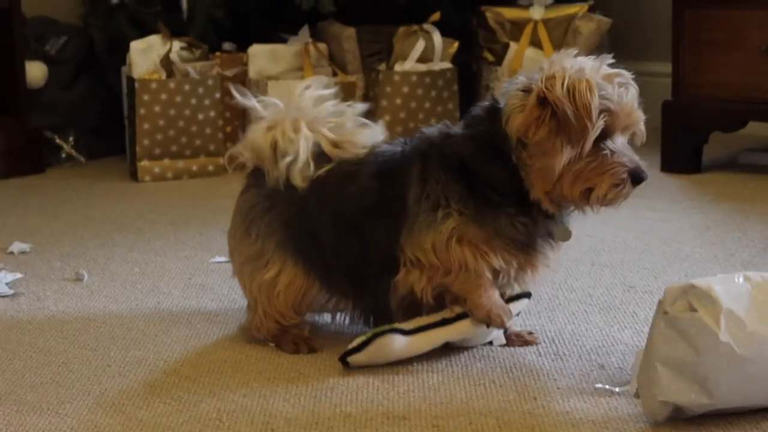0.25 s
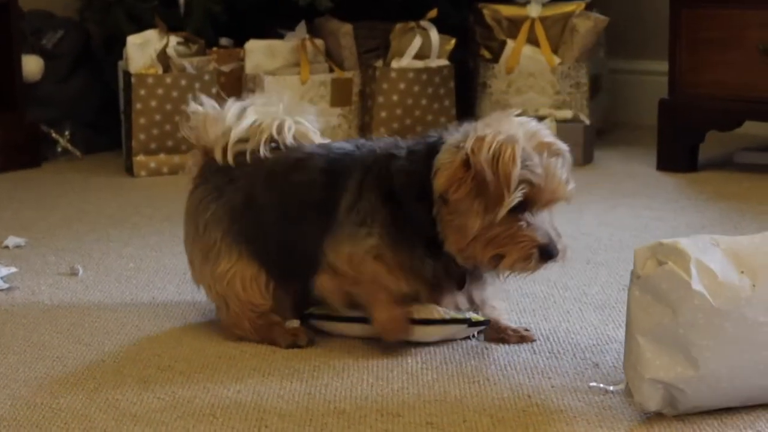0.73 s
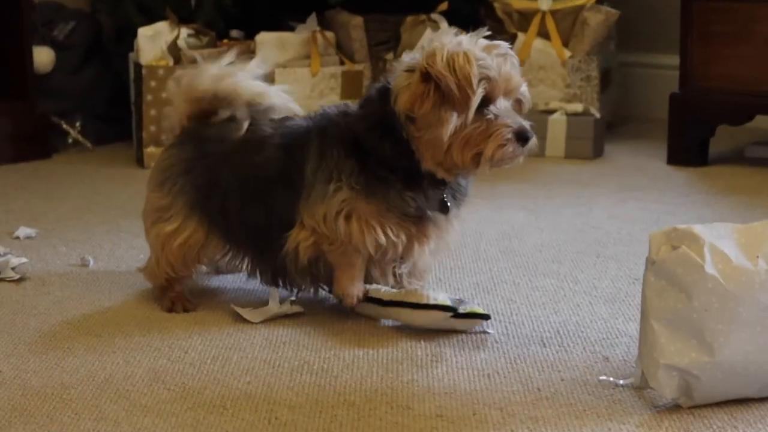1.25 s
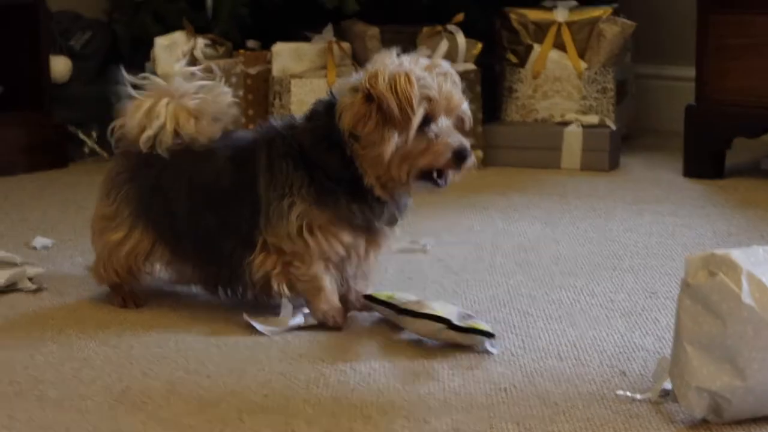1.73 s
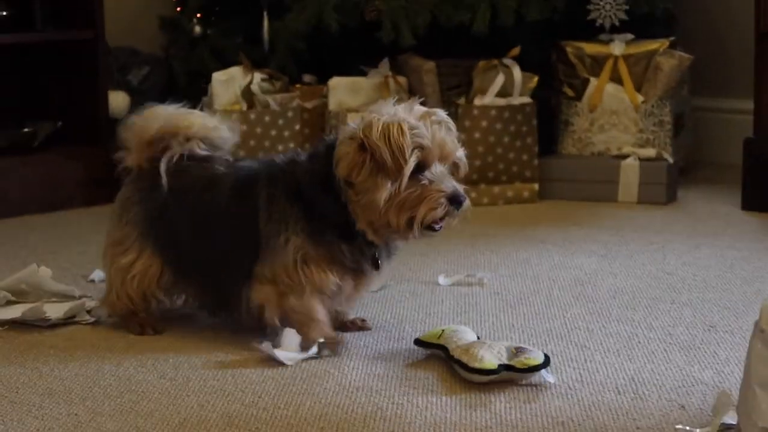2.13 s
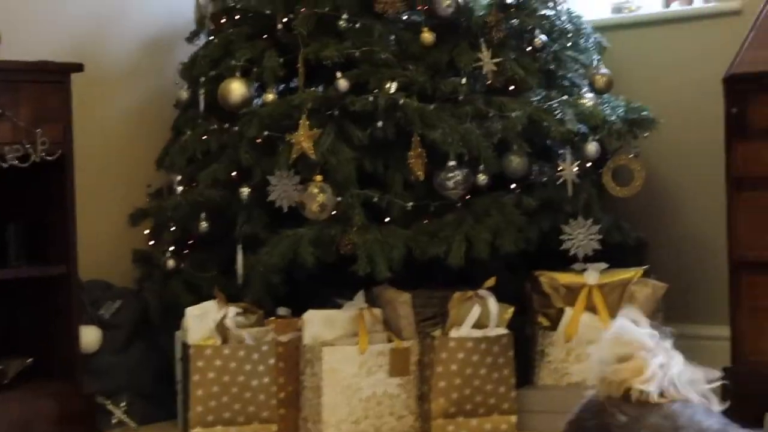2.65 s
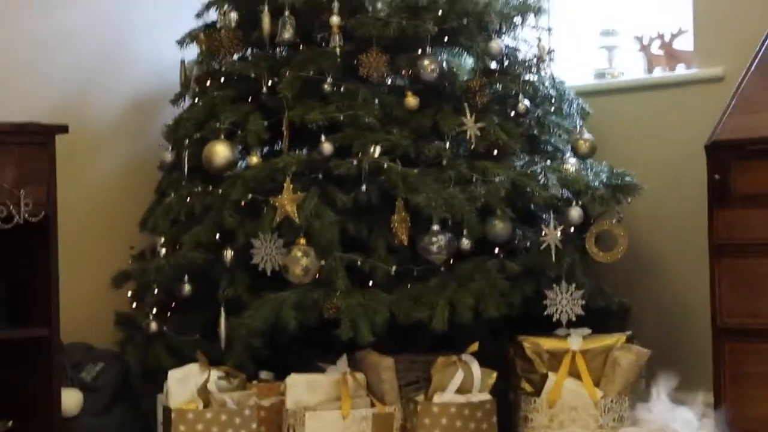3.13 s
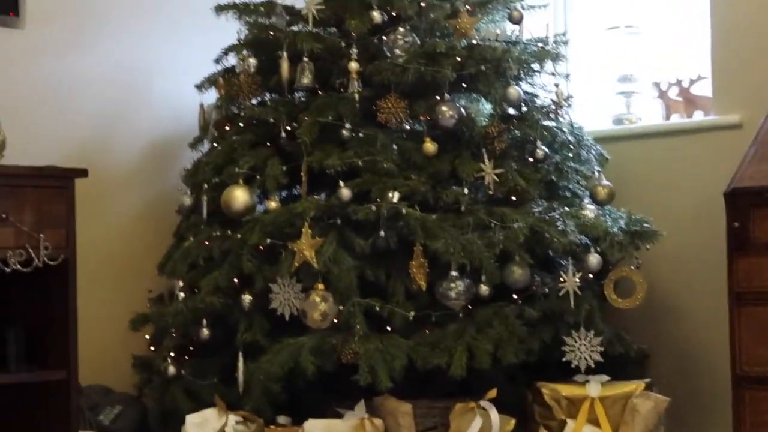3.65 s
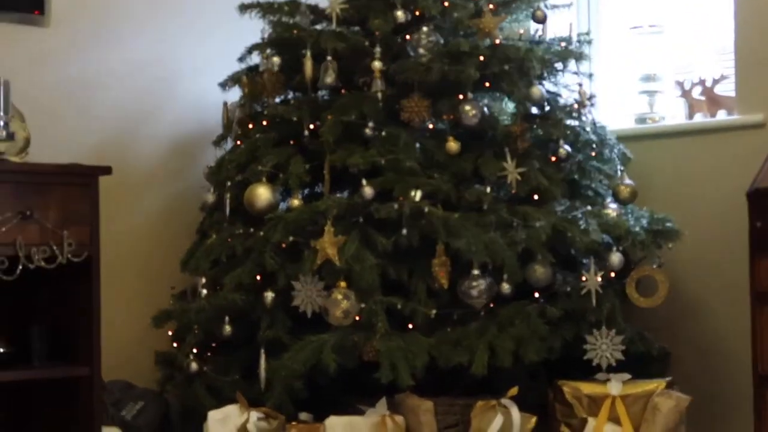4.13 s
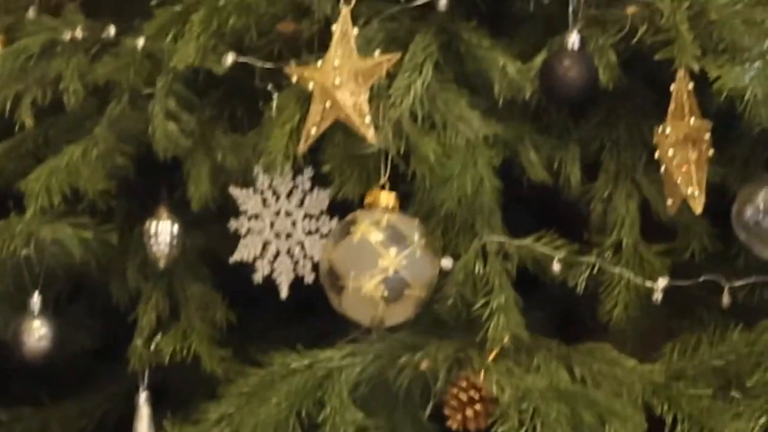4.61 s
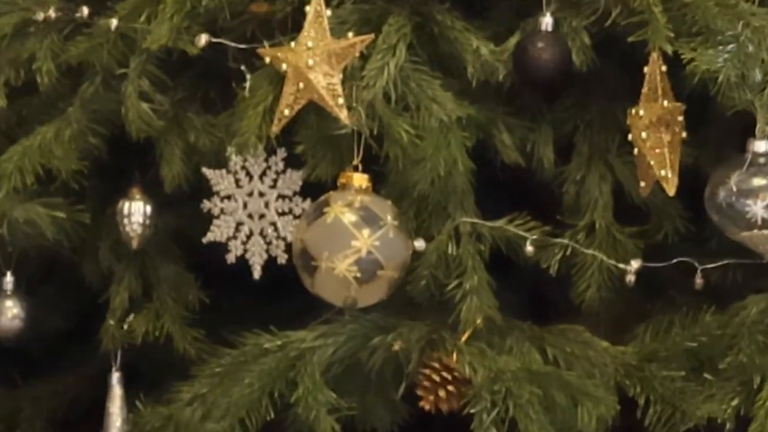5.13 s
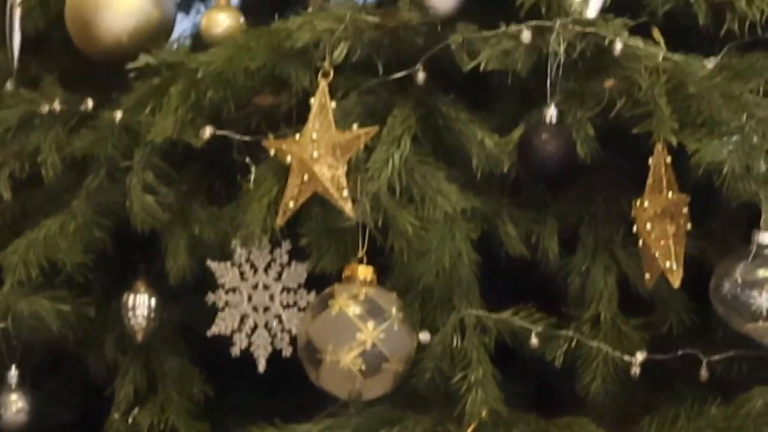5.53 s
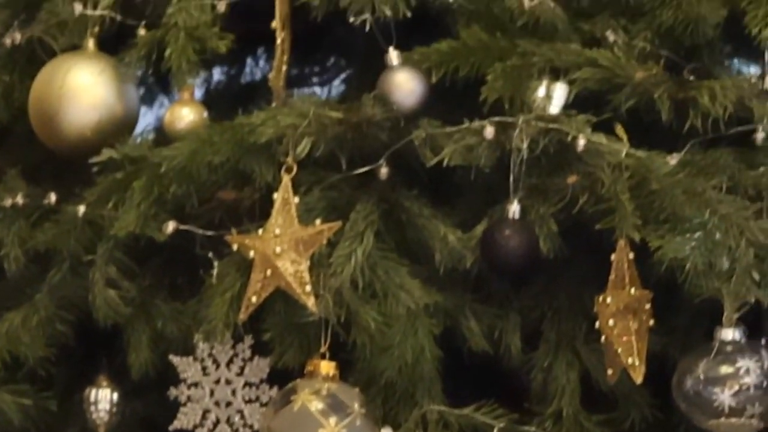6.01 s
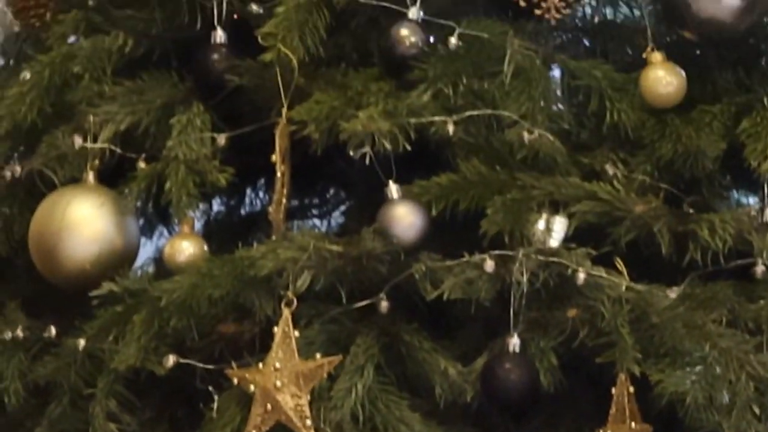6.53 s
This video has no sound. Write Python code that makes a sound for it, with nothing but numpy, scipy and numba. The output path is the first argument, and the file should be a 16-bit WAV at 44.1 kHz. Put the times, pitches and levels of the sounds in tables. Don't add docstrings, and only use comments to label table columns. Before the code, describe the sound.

A small dog scuffles with a stuffed toy on carpet, soft knocks, claw ticks and paper crackles mixed with short uneven pants.

```python
import sys
import numpy as np
from scipy import signal
from scipy.fft import rfft, irfft
from scipy.io import wavfile
from scipy.ndimage import uniform_filter1d
from numba import njit

SR = 44100
rng = np.random.default_rng(int(sys.argv[2]) if len(sys.argv) > 2 else 0)


def to_wav(s):
    ch = np.atleast_2d(s).T
    pcm = np.round(np.clip(ch, -1, 1) * 32767)
    wavfile.write(sys.argv[1], SR, pcm.astype(np.int16))


def how_loud(loudness_db):
    steps = np.asarray(loudness_db, float) / 20
    return 10 ** steps


N = 298116
TIME = np.arange(N) / SR


def unit(x):
    return x / np.sqrt(np.mean(x ** 2))


def colour(x, points, scale=1):
    hz, db = np.transpose(points)
    bins_hz = np.arange(N // 2 + 1) * SR / N + 1
    curve_db = np.interp(np.log(bins_hz), np.log(hz), db)
    return irfft(rfft(x) * how_loud(scale * curve_db), N)


@njit
def svf(x, hz, width):
    y, band, low = np.empty(len(x)), 0., 0.
    for i in range(len(x)):
        g = np.tan(np.pi * hz[i] / SR)
        k = width / hz[i]
        v = (band + g * (x[i] - low)) / (1 + g * (g + k))
        band = 2 * v - band
        low = low + 2 * g * v
        y[i] = k * v
    return y


def patches(count, spread_db=2.5, per_s=60):
    size = int(SR / per_s)
    steps = np.repeat(rng.standard_normal((count, N // size + 1)), size, axis=1)[:, :N]
    return how_loud(spread_db * uniform_filter1d(steps, size // 2, axis=1))


def resonate(x, modes):
    total, sign = np.zeros(N), 1
    for (hz, width_hz, db), patch in zip(modes, patches(len(modes))):
        band = svf(x, np.full(N, 1. * hz), 1. * width_hz) / np.sqrt(width_hz)
        total += sign * how_loud(db) * patch * band
        sign = -sign
    return unit(total)


def slips(rate_per_s, spread_db):
    size = np.minimum(rng.exponential(size=N), 3)
    kicks = (rng.random(N) < rate_per_s / SR) * how_loud(size * spread_db)
    decay = np.exp(-rate_per_s / SR * 1.9)
    gate = uniform_filter1d(signal.lfilter([1], [1, -decay], kicks), size=60) + .5
    return gate / np.sqrt(uniform_filter1d(gate ** 2, size=800))


def crumple(rate_per_s, low_hz, high_hz):
    out = np.zeros(N + 600)
    t = np.arange(600) / SR
    for when, pitch, size in rng.random((int(rate_per_s * N / SR), 3)):
        hz = low_hz * (high_hz / low_hz) ** pitch
        ring = np.sin(2 * np.pi * hz * t) * np.exp(-t * hz / 2.6)
        i = int(when * N)
        out[i:i + len(t)] += how_loud(8 * size ** 2) * ring
    return unit(out[:N])


def strike(s, peak_db, hz, t60_s, rough):
    t = np.arange(3000) / SR
    jitter = np.cumsum(rng.standard_normal(len(t))) * rough
    attack = 1 - np.exp(-t * hz * 1.46)
    fade = np.cos(t * SR / len(t) * np.pi / 2)
    decay = how_loud(peak_db - 60 * t / max(t60_s, .001))
    return int(s * SR), np.sin(2 * np.pi * hz * t + jitter) * decay * fade * attack


def thud(s, peak_db, hz):
    return strike(s, peak_db, hz, t60_s=.028, rough=.16)


def lay(strikes):
    out = np.zeros(N + 3000)
    for i, ring in strikes:
        out[i:i + len(ring)] += ring
    return out[:N]


def moves(rows, gain_db, rise_db_s, fall_db_s):
    start_s, hold_s, level_db = np.array(rows)[:, :3].T[:, :, None]
    t = TIME[::40]
    rise_db = rise_db_s * (t - start_s)
    fall_db = fall_db_s * (start_s + np.abs(hold_s) - t)
    shape_db = np.minimum(0, np.minimum(rise_db, fall_db))
    power = how_loud(level_db + np.reshape(gain_db, (-1, 1)) + shape_db) ** 2
    return np.interp(TIME, t, np.sum(power, axis=0))


# time_s, level_db
FIDGET_CURVE = [(0.0, -51.5), (0.15, -50.5), (2.5, -45.5), (2.6, -62), (2.95, -57), (3.1, -47),
                (6.76, -54.5)]
# start_s, hold_s, cloth_db, body_re_cloth_db, paper_re_cloth_db
POUNCE_MOVES = [(0.275, 0.0046, -33.5, -6.5, -8), (0.38, 0.012, -41, -24, 2.5),
                (0.455, 0.096, -51.5, 9.5, -31), (0.8, 0.09, -53.5, 13, -30),
                (1.634, 0.031, -33.5, -4, -4.5), (1.679, 0.049, -24, -11.5, -8.5),
                (0.608, 0.08, -39, -1.5, -3), (1.079, 0.028, -34, -7, -10), (1.133, 0.021, -34, -8.5, -18),
                (1.227, 0.12, -35.5, -4.5, -6), (2.007, 0.066, -33.5, -11, -17),
                (2.203, 0.044, -38.5, 1, -3), (2.478, 0.0086, -38, -4, -18), (3.475, 0.005, -35, -25, -20),
                (3.56, 0.025, -36.5, -3.5, -13), (3.618, 0.047, -33.5, -10.5, -13),
                (3.728, 0.098, -29, -4.5, -7), (3.888, 0.12, -42, -5.5, -8.5), (4.149, 0.12, -42, -10, -12),
                (4.35, 0.14, -44, 1.5, -24), (4.486, 0.031, -32, -4.5, -14), (5.107, 0.012, -26, -2, -9),
                (5.337, 0.0091, -42.5, -1.5, -30), (5.55, 0.1, -33.5, -6.5, -13),
                (6.072, 0.12, -45, -4, -10.5), (6.244, 0.076, -39, -2.5, -11), (6.43, 0.004, -30, -2, -29),
                (6.454, 0.039, -33.5, 3.5, -28), (6.656, 0.079, -45.5, 2.5, -19)]
# start_s, hold_s, cloth_db, body_re_cloth_db, paper_re_cloth_db
DRAG_MOVES = [(0.2, 0.029, -43, -2, -32), (0.645, 0.002, -31.5, -15, -7), (0.76, 0.0014, -30.5, -7, -10.5),
              (0.85, 0.002, -35.5, -5.5, -12), (0.965, 0.023, -35, -3.5, -4.5),
              (1.412, 0.044, -25.5, -6, -8.5), (1.947, 0.045, -33.5, -0.5, -13),
              (2.098, 0.0019, -36, -11, -5), (2.319, 0.057, -33.5, -12, -8.5),
              (3.11, 0.034, -44, -22, -6.5), (3.25, 0.036, -40, -7, -8.5),
              (3.355, 0.0079, -39.5, -4, -10.5), (4.568, 0.046, -30, -2.5, -19),
              (4.755, 0.046, -45, -23, -11), (4.907, 0.016, -32, -6, -5.5), (4.987, 0.002, -32, -4, -22.5),
              (5.075, 0.002, -33, -12, -12), (5.828, 0.026, -40.5, -1, -15), (5.921, 0.095, -37, 1, -13),
              (6.352, 0.067, -38.5, -2.5, -20)]


def effort(fidget_db, fall_db_s, column=None):
    power = how_loud(np.interp(TIME, *np.transpose(FIDGET_CURVE)) + fidget_db) ** 2
    for rows, rise_db_s in ((POUNCE_MOVES, 898), (DRAG_MOVES, 216)):
        gain_db = np.array(rows)[:, column] if column else 0
        power = power + moves(rows, gain_db, rise_db_s, fall_db_s)
    return np.sqrt(power)


# freq_hz, density_db
HUSH_SPECTRUM = [(25, -16), (55, -3), (263, -10), (659, -20), (2990, -19), (8360, -35), (14800, -46),
                 (16000, -60)]
# freq_hz, side_re_mid_db
HUSH_SPREAD = [(60, -23), (110, -6.5), (380, 4), (700, 5), (1290, 1), (2380, -4.5), (8120, 0), (15000, 7)]


def hush():
    mid, side = (how_loud(-50) * unit(colour(rng.standard_normal(N), HUSH_SPECTRUM)) for _ in range(2))
    return mid, colour(side, HUSH_SPREAD)


# freq_hz, width_hz, level_db
BOARD_MODES = [(58, 82, -7), (105.5, 38, -2), (193, 90, -4.5)]
# start_s, hold_s, level_db
STOMP_MOVES = [(0.634, 0.022, -42), (0.958, 0.037, -44), (3.58, 0.054, -42.5), (3.827, 0.017, -32),
               (4.217, .015, -40), (4.509, 0.13, -35), (4.873, 0.11, -40), (5.095, 0.041, -34.5),
               (5.962, .01, -41)]


def boards():
    fall_db_s = 131
    pushed = how_loud(-16) * effort(13, fall_db_s, column=3)
    stomped = moves(STOMP_MOVES, 0, 300, fall_db_s)
    return np.sqrt(pushed ** 2 + stomped) * resonate(rng.standard_normal(N), BOARD_MODES)


# start_s, length_s, level_db, throat_hz, mouth_re_throat_db
PANT_PUFFS = [(0.151, 0.066, -47, 2020, -14), (0.945, 0.047, -32.5, 1560, 2),
              (1.937, 0.041, -30.5, 1450, -1), (1.998, 0.053, -34, 1790, -9),
              (1.998, 0.054, -39, 4100, -25), (2.2, 0.038, -53, 3980, -25),
              (4.497, 0.034, -26.5, 2720, -17), (2.198, 0.077, -35, 2450, -26),
              (2.295, 0.17, -36, 1850, -5), (3.722, 0.089, -28.5, 1900, 2), (3.78, 0.085, -27, 1200, 7),
              (4.151, 0.25, -50, 1900, 5), (4.402, 0.12, -34.5, 1200, -19), (4.412, 0.023, -35, 1260, -11),
              (4.641, 0.093, -38.5, 2320, -6), (4.342, 0.062, -34, 1800, -4.5),
              (4.478, 0.028, -23.5, 1440, 2), (4.572, 0.069, -28.5, 1610, -5),
              (5.327, 0.062, -41, 1840, -8), (5.412, 0.094, -35, 1940, 0), (5.684, 0.1, -36.5, 1970, -4),
              (5.806, .24, -38.5, 1050, -8), (6.069, 0.086, -39, 1950, -8), (6.343, 0.045, -35, 1110, 1),
              (6.637, 0.15, -41, 1070, 7), (6.646, 0.086, -46, 3340, -19)]


def pants():
    out = np.zeros(N + SR)
    pharynx_throat_mouth = np.array([0.536, 1, 1.79])
    for s, length_s, db, throat_hz, mouth_db in PANT_PUFFS:
        share = np.arange(int(length_s * SR)) / (length_s * SR)
        air = rng.standard_normal(SR // 4)[:len(share)]
        sag = 1.02 - 0.049 * share
        cavities = []
        for hz in throat_hz * pharynx_throat_mouth:
            once = svf(air, hz * sag, 0.42 * hz)
            cavities.append(unit(svf(once, hz * sag, 0.42 * hz)))
        pharynx, throat, mouth = cavities
        breath = unit(throat - how_loud(mouth_db) * mouth - how_loud(-7.5) * pharynx)
        swell = np.sin(np.pi * share ** 0.63) ** 0.72
        i = int(s * SR)
        out[i:i + len(share)] += how_loud(db) * breath * swell
    return out[:N]


# start_s, peak_db, pitch_hz
TAG_SNAPS = [(1.265, -21, 3550), (1.631, -26, 2610), (3.4703, -24, 3200), (4.8222, -27, 3400),
             (4.8479, -21, 4300), (4.8928, -8, 4000), (5.0465, -12, 3800), (5.0869, -13, 3800),
             (5.0945, -15, 2900), (5.661, -18, 3800), (5.544, -24, 3600), (6.07, -27, 4000),
             (6.2445, -27, 4200), (5.1045, -10, 3200), (4.39, -21, 1700), (6.4452, -20, 3710)]
# start_s, peak_db,
# pitch_hz
BOOMS = [(0.658, -36, 200), (1.228, -32.5, 215.5), (1.55, -27, 222), (1.66, -35, 203),
         (4.151, -34, 392.5), (2.8, -47, 435), (0.13, -40, 49), (0.95, -34, 55), (4.53, -28, 52.6),
         (5.24, -37, 76), (5.921, -35, 60), (6.285, -36, 372), (4.47, -21.5, 54), (4.568, -23, 199),
         (4.614, -34, 200), (5.289, -37, 157)]


def snaps_and_booms():
    parts = [strike(s, db, hz, 0.67, rough=.12) for s, db, hz in BOOMS]
    for s, db, hz in TAG_SNAPS:
        parts.append(strike(s, db + 6, hz, 0.0026, rough=0.067))
        parts.append(strike(s + 0.0023, db - 3, hz, 0.0052, rough=0.21))
        parts.append(strike(s, db - 3, hz * 1.17, 0.0013, rough=0.091))
    return lay(parts)


# start_s, peak_db, pitch_hz
FOLD_FLICKS = [(0.3952, -18, 3250), (0.6579, -22, 2960), (0.815, -26, 3000), (0.9727, -15, 2430),
               (1.0424, -30, 2590), (1.0794, -17, 3100), (1.2303, -18, 2920), (1.235, -22, 2700),
               (1.275, -19, 2640), (1.3027, -15, 2800), (1.3585, -22, 3090), (1.3723, -19, 2470),
               (1.4177, -8.5, 2680), (1.4323, -12, 2300), (1.442, -24, 1710), (1.469, -16, 2980),
               (1.4846, -18, 1960), (1.6911, -9.5, 1600), (1.756, -17, 3770), (1.9835, -26, 1800),
               (2.0116, -16, 3980), (2.031, -20, 1740), (2.0468, -17, 4170), (2.0507, -24, 1780),
               (2.094, -26, 2620), (2.103, -13, 1680), (2.203, -20, 2610), (2.24, -20, 2280),
               (2.2573, -19, 2850), (2.301, -21, 3170), (3.1766, -29, 2730), (3.2055, -20, 3480),
               (3.3298, -34, 3170), (3.608, -25, 2950), (3.6163, -36, 1820), (3.654, -25, 1750),
               (3.7646, -14, 1930), (3.7868, -15, 2900), (3.855, -20, 2430), (3.9013, -19, 3100),
               (4.3902, -15, 1560), (4.456, -19, 1710), (4.614, -18, 2750), (4.8223, -28, 3820),
               (4.9018, -20, 2220), (4.9976, -27, 2880), (5.083, -18, 2100), (5.129, -22, 1940),
               (5.1646, -19, 1630), (5.354, -26, 2800), (5.5463, -24, 1620), (5.579, -18, 2030),
               (5.5937, -23, 3000), (5.6026, -21, 2960), (5.6185, -22, 3100), (6.0937, -25, 1870),
               (6.4217, -13, 1500), (6.4626, -13.5, 1800), (6.4949, -20, 1530)]
# start_s, peak_db, pitch_hz
MORE_TOY_KNOCKS = [(0.2851, -27, 453), (0.5069, -39, 570), (0.5422, -36, 676), (0.608, -20, 734),
                   (0.6276, -19, 724), (0.753, -22.5, 710), (0.8411, -23, 516), (0.921, -27, 740),
                   (0.9618, -22.5, 1055), (0.9717, -28, 600), (1.3034, -24, 736), (1.372, -22, 610),
                   (1.631, -25.5, 1160), (1.6797, -18, 790), (1.7639, -20, 825), (1.9337, -31, 655),
                   (2.078, -25.5, 507), (2.0922, -18.5, 844), (2.1178, -26, 1020), (2.217, -23, 563),
                   (2.4058, -29, 705), (2.4831, -22.5, 720), (3.0078, -31, 445), (3.2672, -28.5, 870),
                   (3.3541, -26, 1075), (3.5686, -23, 403), (3.608, -27, 430), (3.6306, -25, 830),
                   (3.6538, -26, 1200), (3.793, -19, 570), (3.8175, -20, 790), (4.482, -24, 1290),
                   (4.581, -18, 574), (4.8004, -28, 420), (5.5763, -21, 425), (5.7377, -28.5, 720),
                   (6.0851, -30, 483), (6.4215, -19.5, 866), (6.4445, -6.5, 424), (6.706, -29, 940)]
# start_s, peak_db, pitch_hz
PAPER_SPECKS = [(0.3888, -27, 6180), (0.588, -41, 8350), (0.7617, -32, 6050), (0.9218, -40, 6010),
                (0.9348, -42, 8740), (1.0073, -46, 7240), (1.087, -32, 6370), (1.1475, -35, 6140),
                (1.267, -28, 6050), (1.282, -34, 6800), (1.3029, -27, 6010), (1.3586, -34, 6010),
                (1.433, -25, 8520), (1.4766, -26, 6300), (1.484, -30, 6550), (1.6663, -27, 6360),
                (1.6705, -22, 6010), (1.755, -31, 9700), (1.853, -35, 8000), (1.9969, -20, 6700),
                (2.101, -30, 6170), (2.2925, -37, 8420), (2.3161, -32, 7260), (2.476, -32, 5970),
                (3.1398, -40, 6080), (3.471, -34, 5860), (3.558, -42, 6410), (3.7866, -30, 6270),
                (3.9011, -46, 6010), (3.9659, -32, 6010), (4.8503, -42, 6010), (5.0544, -32, 6010),
                (5.5534, -33, 8600), (5.5624, -33, 6770), (5.6183, -33, 6600), (5.6575, -39, 9560),
                (5.661, -37, 6010), (5.983, -30, 7040), (6.0932, -34, 6070), (6.2544, -28.5, 6250)]


def flicks():
    parts = [thud(s, db + 2, hz) for s, db, hz in MORE_TOY_KNOCKS]
    parts += [strike(s, db + 8, hz, 0.0041, rough=0.36) for s, db, hz in PAPER_SPECKS]
    for s, db, hz in FOLD_FLICKS:
        parts.append(strike(s, db + 3, hz, 0.0045, rough=0.1))
        parts.append(strike(s, db - 20, hz, 0.019, rough=0.23))
    return lay(parts)


# start_s, peak_db, pitch_hz
TOY_KNOCKS = [(0.19, -26, 713), (0.271, -22.5, 506), (0.453, -21, 610), (0.595, -22, 685),
              (0.704, -24, 765), (0.751, -28, 665), (1.077, -20, 777), (1.225, -23.5, 756),
              (1.263, -21.5, 620), (1.296, -27, 660), (1.401, -14, 690), (1.54, -20, 663),
              (1.415, -17, 1060), (1.692, -15.5, 794), (1.85, -20, 560), (1.932, -26, 645),
              (3.434, -26, 614), (3.548, -25, 464), (3.566, -24.5, 382), (4.389, -21, 1055),
              (4.42, -24, 740), (4.544, -14, 393), (4.881, -21, 330), (5.103, -14, 413), (5.116, -19, 404),
              (5.545, -18, 358), (5.608, -24, 487), (5.972, -19, 440), (6.446, -19, 396), (6.473, -16, 493)]
# start_s, peak_db, pitch_hz
CLAW_TICKS = [(0.2705, -22, 2760), (0.3791, -21.5, 3300), (0.597, -19.5, 2980), (0.628, -13.5, 2950),
              (0.7525, -16, 3100), (0.9985, -22, 2770), (1.072, -26, 3210), (1.085, -19, 3350),
              (1.1473, -22, 2660), (1.227, -25, 2700), (1.266, -21, 2380), (1.358, -28, 2820),
              (1.4028, -15.5, 3340), (1.542, -19, 2690), (1.631, -34, 2270), (1.666, -13.5, 2890),
              (1.932, -29, 1660), (1.9957, -21, 1770), (2.1006, -19.5, 1830), (2.193, -28, 2820),
              (2.2043, -32, 2400), (2.292, -26.5, 2270), (2.4754, -21, 2645)]
# start_s, peak_db, pitch_hz
CLAW_TICKS_LATER = [(3.1978, -22, 2930), (3.472, -19, 1875), (3.607, -41, 2130), (3.724, -20, 1970),
                    (4.39, -19, 1500), (4.486, -30, 2650), (4.55, -17.5, 2340), (4.7574, -24.5, 2130),
                    (4.8957, -20.5, 3310), (4.981, -19, 2800), (5.1033, -13, 1620), (5.336, -27, 2770),
                    (5.5431, -30, 2060), (5.575, -27, 2200), (5.661, -37, 2950), (6.0701, -28, 1874),
                    (6.2445, -33, 1840), (6.431, -17, 1674)]
# start_s, peak_db, pitch_hz
MORE_TICKS = [(0.449, -43, 1126), (1.853, -21, 1043), (2.029, -36, 1790), (3.97, -34, 2334),
              (4.82, -31, 1450), (5.093, -26, 2350), (6.422, -16, 882), (6.4452, -14.5, 906),
              (6.4535, -20, 788), (6.461, -34, 2800)]
# start_s, peak_db
PAPER_CRACKLES = [(0.378, -32), (0.596, -27), (0.626, -21.5), (0.7505, -28), (0.845, -31), (1.0856, -29),
                  (1.228, -23), (1.265, -27), (1.3947, -40), (1.476, -34), (1.6741, -24), (1.7534, -39),
                  (2.004, -22.5), (2.191, -33), (2.2917, -39), (2.322, -25.5), (3.476, -31.5), (3.541, -30),
                  (3.607, -29.5), (3.9737, -37), (4.822, -40), (4.847, -44), (4.8916, -33), (5.045, -41),
                  (5.104, -26), (5.544, -33), (5.668, -29), (5.9813, -37), (6.2453, -35), (6.449, -32)]


def hits():
    dull = [thud(s, db + 0.5, hz) for s, db, hz in TOY_KNOCKS]
    for s, db, hz in CLAW_TICKS + CLAW_TICKS_LATER + MORE_TICKS:
        dull.append(strike(s, db + 5, hz, 0.0031, rough=0.021))
        dull.append(strike(s, db - 13, hz, 0.19, rough=.24))
    bright = []
    for s, db in PAPER_CRACKLES:
        bright.append(strike(s, db + 0.5, 6500., 0.001, rough=0.4))
        bright.append(strike(s, db - 8, 7000., 0.043, rough=1.0))
    return (colour(lay(dull), [(5000, 3.5), (8000, 0), (15000, -16)])
            + colour(lay(bright), [(2500, -16), (5000, 9), (15000, -2)]))


# freq_hz, width_hz, level_db
BODY_MODES = [(216.5, 9.2, -8), (354, 78, 3), (570, 480, -1.5), (823, 148, 3.5)]
# freq_hz, width_hz, level_db
CLOTH_MODES = [(1200, 380, 0.5), (1900, 720, 4), (3100, 1050, 3.5), (3980, 4000, -10.5)]
# freq_hz, density_db
PAPER_SPECTRUM = [(2350, -19), (4000, 1.5), (4440, -1), (5570, -4.5), (13400, -26.5), (15000, -27),
                  (16000, -55)]
# time_s, pitch_hz
SQUASH_PITCH = [(0.0, 510), (0.73, 596), (2.6, 586), (2.82, 448), (3.84, 556), (4.16, 460), (4.37, 565),
                (5.18, 462), (5.59, 500), (6.76, 450)]


def scuffle():
    gate = slips(200., spread_db=-8.5)
    cloth_air, body_air, paper_air = rng.standard_normal((3, N))

    cloth = resonate(gate * cloth_air, CLOTH_MODES) + 0.43 * crumple(500., 936., 4730.)
    cloth = unit(colour(cloth, [(500, -3.5), (1100, -15)]))

    rub = gate ** 1.5 * slips(120., spread_db=-2) * body_air
    squashed = unit(svf(rub, np.interp(TIME, *np.transpose(SQUASH_PITCH)), 126.))
    body = unit(resonate(rub, BODY_MODES) + 0.35 * crumple(120., 255., 940.) + 0.6 * squashed)

    rustle = gate ** .5 * slips(280., spread_db=-2.5) * paper_air
    rustle = rustle + 0.29 * crumple(110., 4460., 17800.)
    paper = unit(colour(rustle, [(2500, -36)] + PAPER_SPECTRUM))
    edges = colour(paper, [(7000, -40), (10000, 0)])
    paper = np.sum(patches(2) * [paper - edges, edges], axis=0)

    return (effort(0, 201) * cloth
            + effort(1, 201, column=3) * body
            + how_loud(0.5) * effort(-14.5, 248, column=4) * paper)


def tail(t60_s, length_s):
    t = np.arange(int(length_s * SR)) / SR
    h = rng.standard_normal(len(t)) * how_loud(-60 * t / t60_s)
    return h / np.sqrt(np.sum(h ** 2))


def moving(x, t60_s, length_s, count):
    hop = N // count + 1
    out = np.zeros(N + 4 * hop + int(length_s * SR))
    padded = np.r_[np.zeros(hop), x, np.zeros(2 * hop)]
    fade = np.sqrt(np.hanning(2 * hop))
    for i in range(0, N + hop, hop):
        echo = signal.fftconvolve(padded[i:i + 2 * hop] * fade, tail(t60_s, length_s))
        out[i:i + len(echo)] += echo
    return out[hop:hop + N]


# freq_hz, side_re_mid_db
SIDE_SPREAD = [(60, -41), (160, -28), (400, -19.5), (1300, -16), (2400, -14), (4400, -5), (8100, 1),
               (15000, 6.5)]
# freq_hz, left_re_right_db
STEREO_LEAN = [(250, -0.5), (600, 2.5), (1100, -0.3), (8000, -0.5)]


def scene():
    dog = boards() + pants() + snaps_and_booms() + flicks() + hits() + scuffle()
    delayed = np.r_[np.zeros(200), dog[:-200]]
    room = moving(delayed, t60_s=0.15, length_s=.3, count=24)
    mid = dog + how_loud(-8.5) * colour(room, [(300, 0.17), (3000, -1.4), (12000, 1.9)])
    side = colour(moving(mid, t60_s=0.013, length_s=.03, count=160), SIDE_SPREAD)
    hush_mid, hush_side = hush()
    left = colour(mid + side, STEREO_LEAN, scale=0.75) + hush_mid + hush_side
    right = colour(mid - side, STEREO_LEAN, scale=-0.051) + hush_mid - hush_side
    return np.array([left, right])


def band_limit(x):
    return signal.sosfilt(signal.butter(12, 15700, fs=SR, output="sos"), x)


def record(dry):
    thin = signal.sosfilt(signal.butter(2, 40., "high", fs=SR, output="sos"), dry)
    rounded = np.tanh(1.2 * thin) / 1.2
    mix = signal.sosfilt(signal.ellip(8, .2, 70, 15600, fs=SR, output="sos"), rounded)
    return band_limit(mix)


dry = scene()
out = record(dry)
to_wav(out)
```